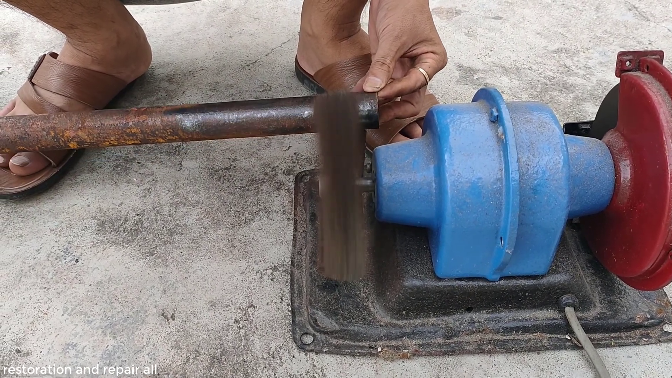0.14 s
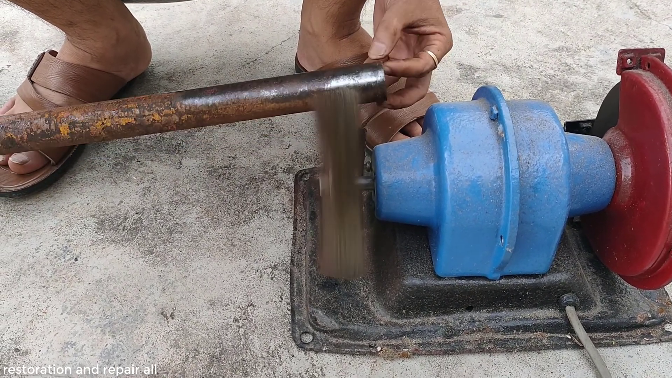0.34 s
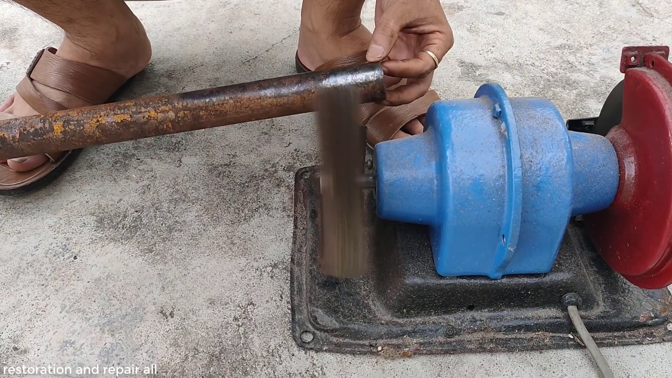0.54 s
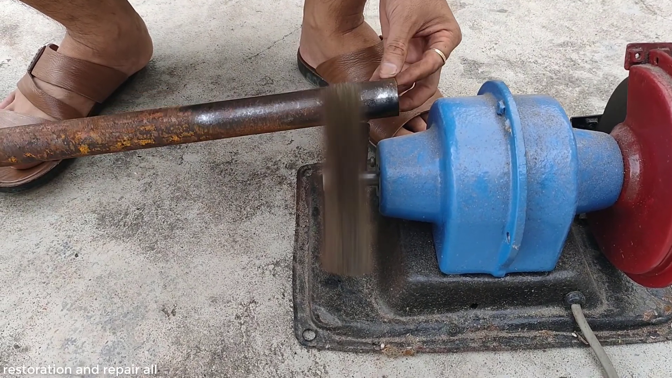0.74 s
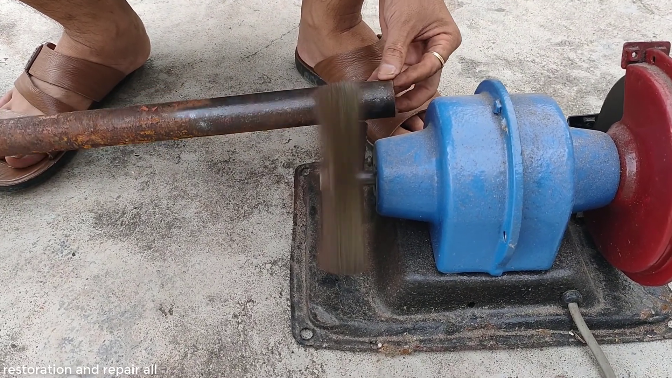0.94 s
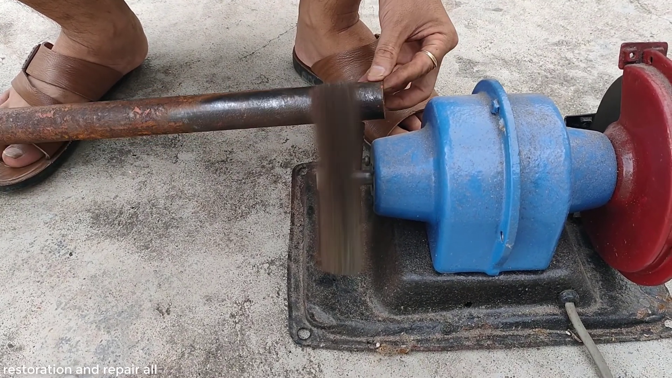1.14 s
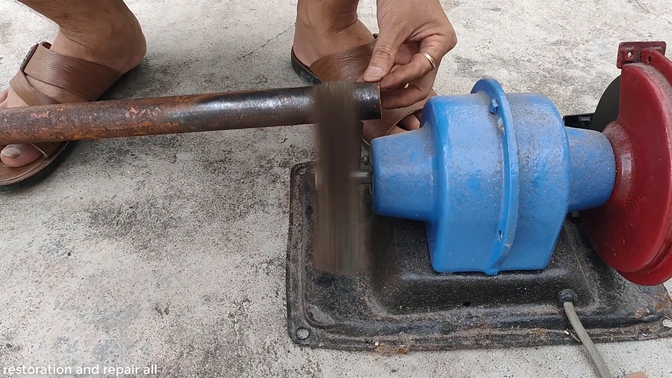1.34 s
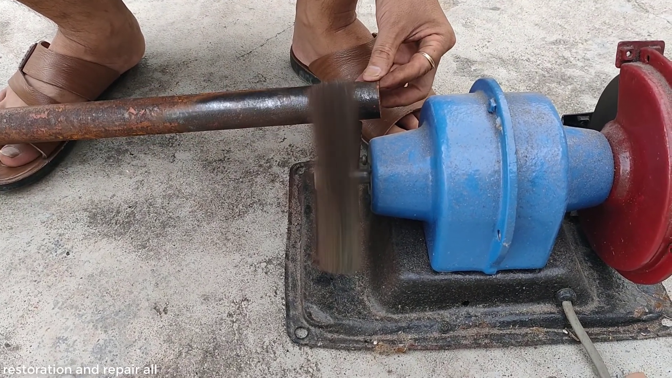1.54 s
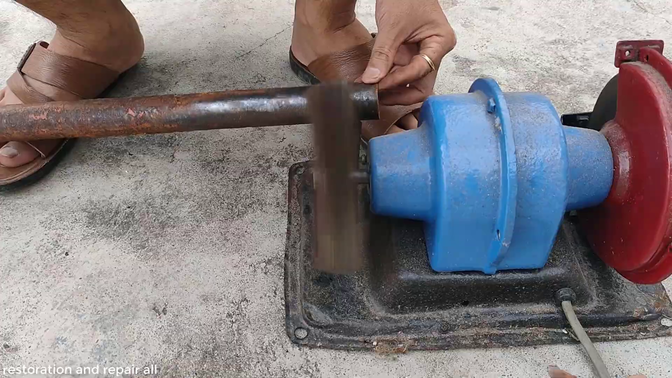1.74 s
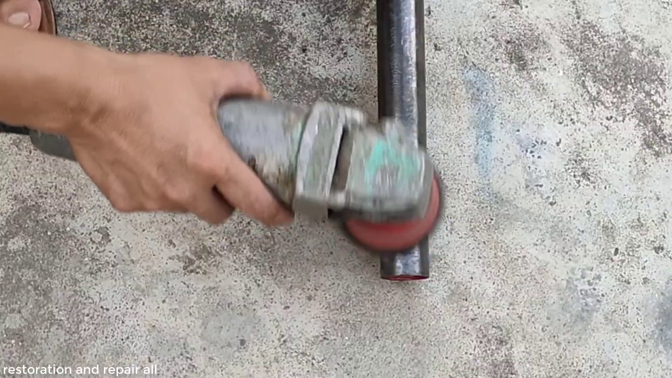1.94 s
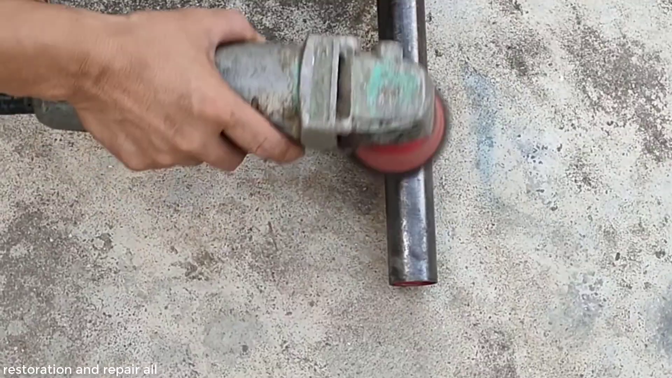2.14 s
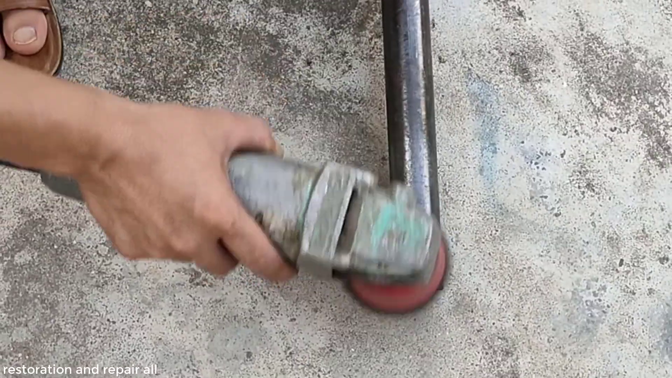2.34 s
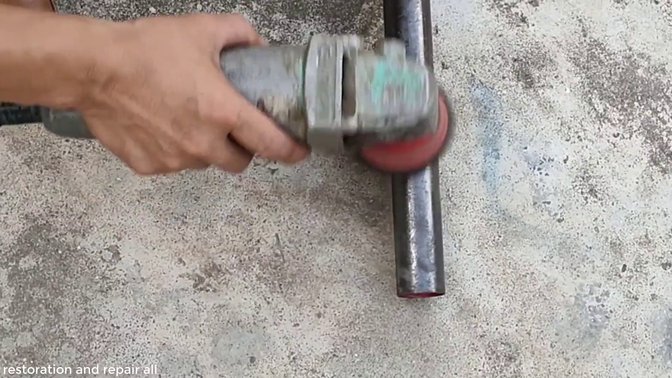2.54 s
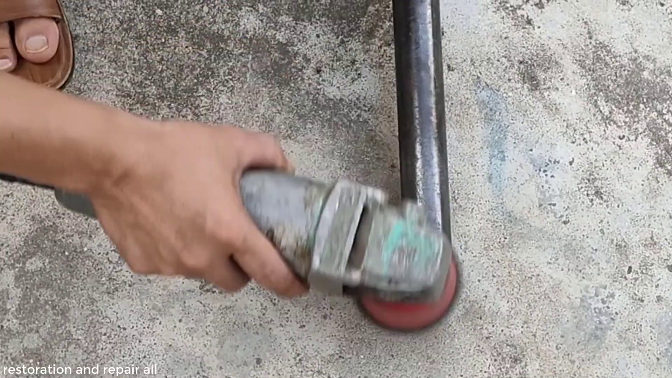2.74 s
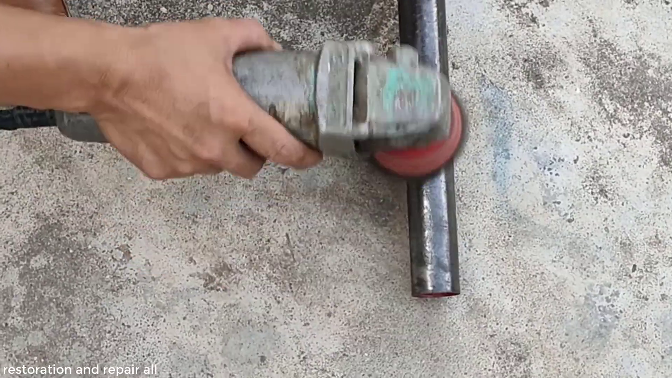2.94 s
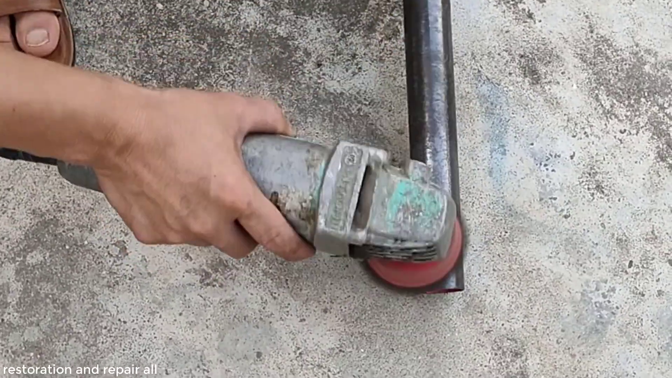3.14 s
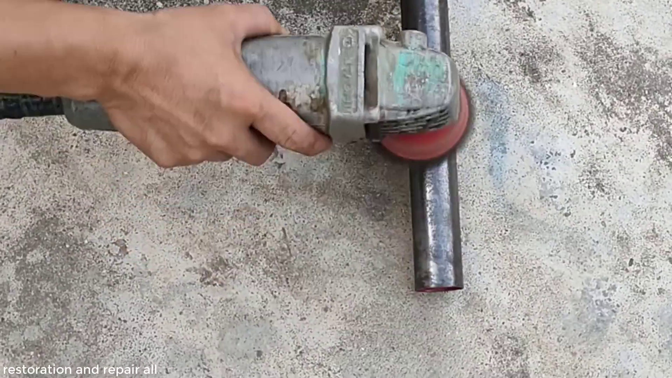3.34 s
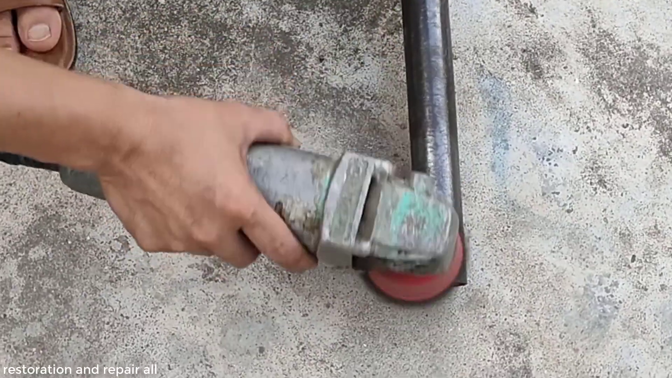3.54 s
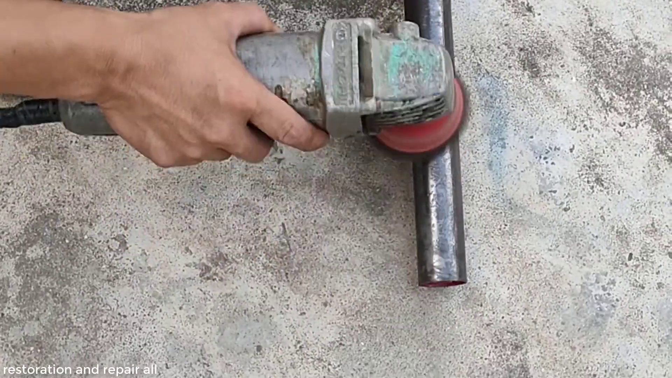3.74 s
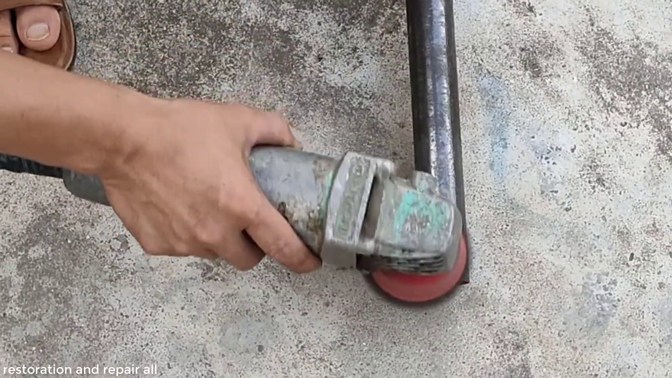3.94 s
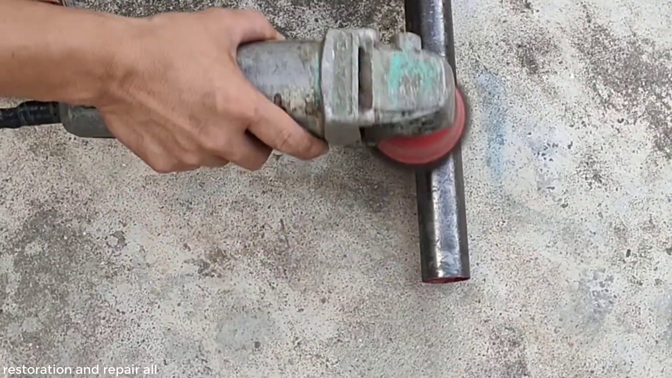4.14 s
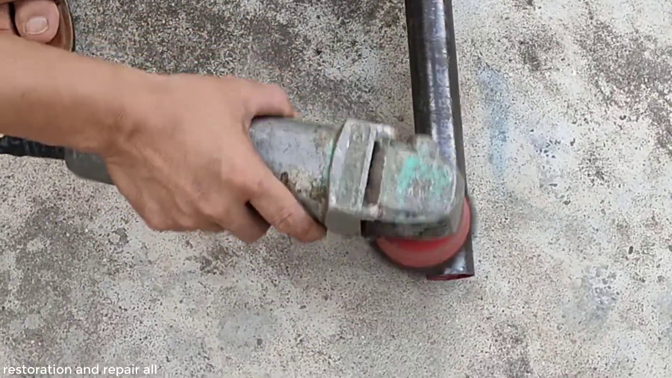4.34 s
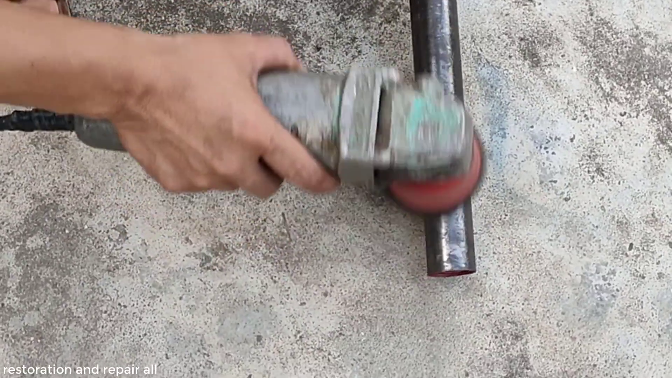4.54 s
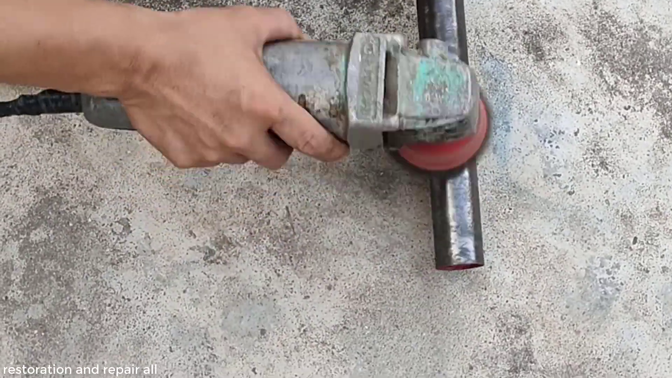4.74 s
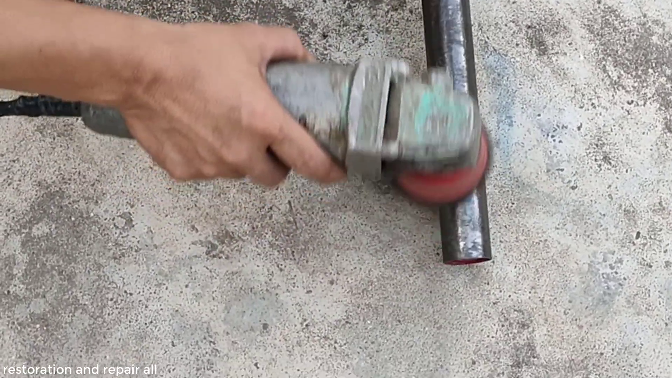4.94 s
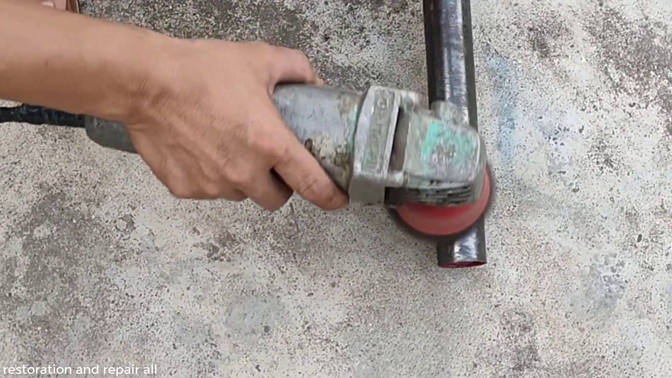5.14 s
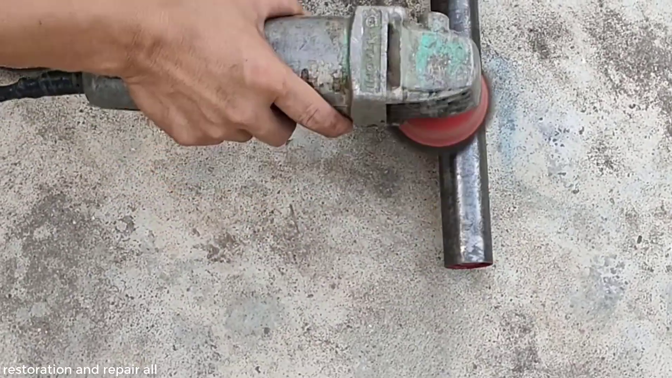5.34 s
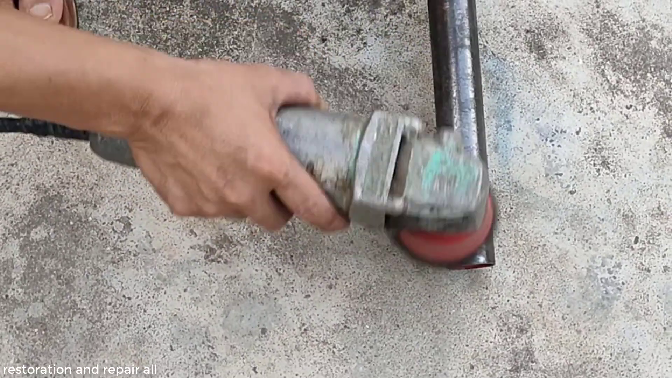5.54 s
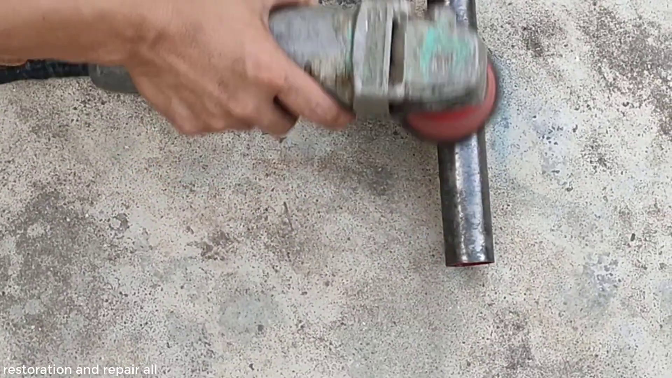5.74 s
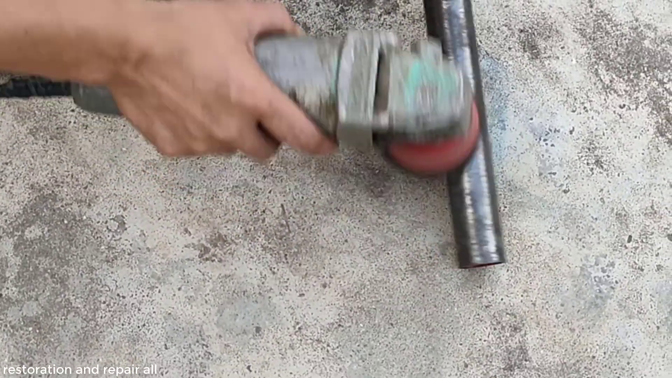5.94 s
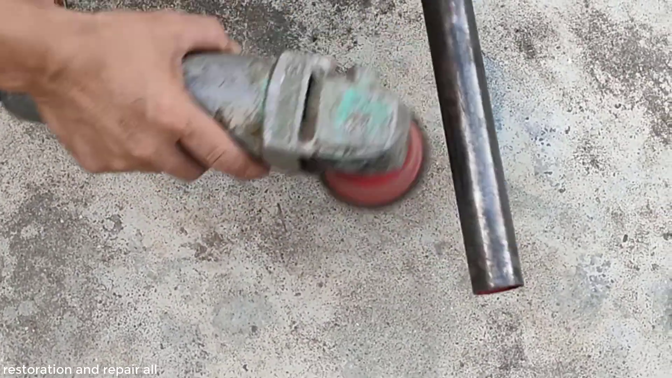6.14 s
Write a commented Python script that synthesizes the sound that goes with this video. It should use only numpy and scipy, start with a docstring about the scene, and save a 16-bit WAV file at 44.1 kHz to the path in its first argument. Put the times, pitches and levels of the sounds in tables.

```python
"""An angle grinder sands a steel tube; before a cut, a wire wheel on a bench grinder brushes the tube.
Angle grinder: lines locked to the armature whine over band-wise noise from the disc, fan and housing.
Wire wheel: its high spot strikes once a turn, pulsing scraping noise and the rings of the tube.
A hum and one sliding ping join the wheel.
Wind rumbles and pops on the two microphone ports of a phone held above the work."""
import sys
import numpy as np
from scipy import signal
from scipy.fft import rfft, irfft, next_fast_len
from scipy.io import wavfile
from scipy.ndimage import uniform_filter1d

SR = 44100
rng = np.random.default_rng(int(sys.argv[2]) if len(sys.argv) > 2 else 0)


def wrap_up_sound(samples):
    """Save the sound to the file named by the first command line argument, as 16-bit audio."""
    columns = np.atleast_2d(samples).T
    # keep every value between -1 and 1, then stretch to whole-number steps
    tamed = np.clip(columns, -1, 1)
    steps = np.round(tamed * 32767).astype(np.int16)
    wavfile.write(sys.argv[1], SR, steps)


N = 277389
T_S = np.arange(N) / SR
CUT_S = 1.945


def undb(db):
    """Amplitude ratio of a level in dB."""
    return 10 ** (np.asarray(db) / 20)


def curves(table):
    """Columns of a table, interpolated over its first column (s)."""
    s, *columns = np.transpose(table)
    return [np.interp(T_S, s, c) for c in columns]


def walk(rate_hz):
    """Random levels held 1 / rate_hz and slewed twice; spread near 1."""
    hold = int(SR / rate_hz)
    steps = np.repeat(rng.standard_normal(N // 50 + 1), hold)[:N]
    return 1.3 * uniform_filter1d(uniform_filter1d(steps, hold), hold)


def colour(x, points, modes=(), lo_hz=1, hi_hz=1e5):
    """Minimum-phase filter from (Hz, dB) points and resonances, kept between two edges."""
    size = next_fast_len(N + 8192) // 2 * 2
    f = np.arange(size // 2 + 1) * SR / size + 1
    point_hz, point_db = np.array(points).T
    db = np.interp(np.log(f), np.log(point_hz), point_db)
    for hz, width_hz, peak_db in modes:
        db = db + peak_db / (1 + (2 * (f - hz) / width_hz) ** 2)
    gain = undb(db) / np.sqrt((1 + (lo_hz / f) ** 16) * (1 + (f / hi_hz) ** 16))
    # folding the cepstrum makes the filter causal
    cepstrum = irfft(np.log(gain + 1e-7), size)
    cepstrum[1:size // 2] *= 2
    cepstrum[size // 2 + 1:] = 0
    return irfft(rfft(x, size) * np.exp(rfft(cepstrum)), size)[..., :N]


def grit(grain_db):
    """Dense ticks of uneven size, two unrelated streams."""
    size_db = grain_db * np.minimum(rng.exponential(size=(2, N)), 5)
    return rng.standard_normal((2, N)) * undb(size_db)


def scrape(beat, mid, side, modes, side_db, lo_hz, hi_hz, grain_db=2.5):
    """One band of friction: ticks through the body; what both ports share has rms 1."""
    ticks = beat * grit(grain_db)
    m = colour(ticks[0], mid, modes, lo_hz, hi_hz)
    s = colour(ticks[1], side, modes, lo_hz, hi_hz) * undb(side_db)
    return np.array([m + s, m - s]) / np.std(m)


# motor slowed by the load, racing as the disc leaves the tube: time_s, mesh_hz, level_db
ANGLE = [(1.95, 8580, -37.5), (2.15, 8695, -36), (2.4, 8630, -37.5), (2.6, 8635, -36.5),
         (2.72, 8645, -36.5), (2.95, 8750, -36), (3.12, 8610, -36), (3.32, 8760, -36.5), (3.5, 8660, -36.5),
         (3.68, 8830, -34.5), (3.92, 8536, -35.5), (4.1, 8680, -36.5), (4.3, 8490, -35.5),
         (4.43, 8696, -35.5), (4.63, 8524, -34.5), (4.75, 8610, -36), (4.9, 8365, -36), (5.0, 8440, -35.5),
         (5.2, 8400, -35), (5.35, 8534, -35), (5.5, 8540, -36.5), (5.63, 8720, -35), (5.85, 8460, -35),
         (6.03, 8570, -35.5), (6.15, 8990, -34.5), (6.29, 9450, -36)]
# rasp shifting between housing rings: time_s, upper_db, lower_db, tilt_db (top over bottom of upper ring)
RASP = [(1.95, -41.5, -47, 3), (2.2, -40.5, -42.5, 2), (2.3, -37.5, -42.5, 1), (2.45, -40, -43, 5),
        (2.62, -40.5, -42, 1), (2.85, -38.5, -45.5, -1), (3.0, -38, -43.5, 4), (3.2, -46, -42.5, 0),
        (3.33, -38.5, -41, 3), (3.6, -40, -44.5, 0), (3.75, -36.5, -41.5, -2), (4.0, -37.5, -42, 0),
        (4.15, -37, -41.5, 7), (4.4, -37.5, -41.5, -4), (4.5, -35, -43, 3), (4.65, -40, -42, 3),
        (4.8, -36.5, -41.5, 3), (4.92, -40, -42.5, 0), (5.2, -37, -42.5, 3), (5.3, -37, -39, 4),
        (5.5, -38, -43, 1), (5.78, -35.5, -40, -3), (5.98, -37, -39.5, -1), (6.1, -36.5, -40, -4),
        (6.29, -39.5, -41.5, 0)]
# band edges: hz
ANGLE_EDGES_HZ = [1, 1500, 2450, 3500, 3970, 4400, 7000, 1e5]
# relative noise spectrum common to both ports: freq_hz, density_db
ANGLE_MID = [(150, -48), (300, -35.5), (600, -27.5), (1000, -25), (1600, -18), (2000, -10.5), (2900, -12),
             (3050, -14), (4000, -7.5), (5200, -7.5), (7000, -10.5), (8100, -20), (9500, -9), (11500, -5),
             (14800, -6), (15700, -16)]
# relative noise spectrum opposed between ports: freq_hz, density_db
ANGLE_SIDE = [(150, -64), (300, -36), (700, -42.5), (1100, -40.5), (1350, -36), (2000, -18.5), (3000, -3.5),
              (3800, -9), (5000, 2), (7400, -1), (8300, -12.5), (9800, 0), (12500, 6), (15000, 2),
              (15700, -16)]
# housing resonances: freq_hz, width_hz, gain_db
HOUSING = [(1990, 330, 7), (3947, 61, 9.5), (4115, 260, 5), (4660, 52, 8), (5800, 82, -1.5)]
# port balance: freq_hz, left_minus_right_db
ANGLE_LEAN = [(3000, 1), (4500, -3), (5500, 3.5), (8600, -1), (10800, 3.5), (12700, 2.5), (15000, -8.5)]
MESH_PER_TURN, SPINDLE_PER_TURN = 88 / 3, 11 / 36
MOTOR_DB, MIDDLE_DB = -46.5, -38.5  # below the rings; between them
DISC_DB, FAN_DB = -4.5, 0.07  # re level_db of ANGLE
PATCHY_DB, PATCHY_RATE_HZ = 1.6, 16


def angle_grinder():
    """Noise bands of housing, disc and fan pulse with the spindle and flicker alone under the armature whine."""
    mesh_hz, level_db = curves(ANGLE)
    upper_db, lower_db, tilt_db = curves(RASP)
    armature_hz = mesh_hz / MESH_PER_TURN
    turns = np.cumsum(armature_hz) / SR
    spindle = np.cos(2 * np.pi * turns * SPINDLE_PER_TURN)
    hand = walk(19)  # pressure on the tube wavers
    bands_db = [MOTOR_DB, lower_db, MIDDLE_DB, upper_db - 5.5 - tilt_db / 2, upper_db - 4 + tilt_db / 2,
                level_db + DISC_DB, level_db + FAN_DB]
    bites = [.4, .9, .7, 1, 1, .6, .45]
    noise = 0
    for band_db, bite, edge in zip(bands_db, bites, zip(ANGLE_EDGES_HZ, ANGLE_EDGES_HZ[1:])):
        beat = undb(bite * (1.2 * walk(45) + .6 * spindle))
        patch_db = .55 * hand + bite * PATCHY_DB * walk(PATCHY_RATE_HZ)
        band = scrape(beat, ANGLE_MID, ANGLE_SIDE, HOUSING, -8.5, *edge)
        noise = noise + undb(band_db + patch_db) * band
    lean = np.array(ANGLE_LEAN)
    leaning = np.array([colour(port, lean * [1, k]) for port, k in zip(noise, (.5, -.5))])
    return leaning + whine(turns, armature_hz)


# multiples of armature speed, 22/9 and 88/3 from the geared-down spindle: order
WHINE_ORDERS = [1, 22 / 9, 88 / 3, 5, 8, 9, 10, 14, 7, 11, 12, 13, 19, 43, 46, 50, 52]


def whine(turns, armature_hz):
    """Lines locked to the armature; the shaft shudders, each line flutters and reaches the ports with its own lag."""
    out = 0
    shudder = .04 * walk(35) + .035 * walk(120)
    for order, line_db in zip(WHINE_ORDERS, whine_levels(armature_hz)):
        apart = min(order / 8.9, 1) * np.array([[1], [-1]])
        phase = 2 * np.pi * order * turns + order * shudder + 0.1 * apart * walk(1.82)
        flutter_db = .4 * min(order / 5, 1) * walk(10) + 1.8 * min(order / 8, 1.2) * walk(30)
        pan_db = 2.2 * apart * walk(4)
        out = out + np.sqrt(2) * undb(line_db + flutter_db + pan_db) * np.sin(phase)
    return out


# first eight orders: rms_db, bite_db (per 10 Hz/s of slowing), free_db (gained running free)
WHINE_STRONG = [(-64, -0.5, 6.5), (-52.5, 0, 13), (-52.5, 0, 2), (-54, 0.2, -6), (-48.5, 0.1, -22),
                (-56, 0.1, -12), (-53, 0.1, -12), (-52.5, 0.2, -24)]
# remaining orders: rms_db
WHINE_STEADY_DB = [-56, -58, -56, -53.5, -62, -60, -59, -54, -59]
# lines ringing out as the tool turns in the hand: order, centre_s, length_s, gain_db
SWELLS = [(8, 2.0, .12, 4), (8, 2.25, .2, 4), (8, 2.68, .3, 4), (8, 3.05, .2, 5), (8, 3.7, .6, 2.5),
          (8, 4.2, .25, 3), (8, 4.5, .1, 10), (8, 4.62, .15, 6), (8, 4.8, .2, 5.5), (8, 5.0, .1, 3),
          (8, 5.15, .2, 9), (8, 5.4, .2, 3), (8, 5.7, .14, 5), (8, 5.86, .12, 4), (9, 2.7, .12, 6),
          (9, 2.3, .12, 5), (9, 3.85, .15, 10), (9, 4.15, .35, 7), (9, 4.9, .12, 6), (9, 5.3, .15, 5),
          (10, 2.1, .1, 5), (10, 2.5, .2, 4), (10, 2.8, .12, 9), (10, 3.1, .4, 6), (10, 3.5, .15, 7),
          (10, 3.95, .22, 10), (10, 4.25, .35, 5), (10, 4.87, .2, 8), (10, 5.22, .2, 8), (10, 5.5, .15, 6),
          (13, 2.2, .25, 6), (13, 3.35, .15, 5), (13, 3.72, .2, 7), (13, 4.1, .15, 6), (13, 4.5, .16, 11),
          (13, 4.8, .12, 6), (13, 5.74, .28, 11), (14, 2.05, .2, 4), (14, 3.0, .15, 7), (14, 3.35, .2, 6),
          (14, 4.1, .4, 9), (14, 4.53, .15, 6), (14, 4.8, .15, 11), (14, 5.2, .5, 5), (14, 5.88, .2, 4),
          (50, 3.8, .3, 4), (50, 5.1, .2, 4), (43, 3.52, .2, 5), (43, 5.48, .2, 5), (52, 5.1, .2, 7),
          (52, 5.87, .2, 6)]
OTHERS_BITE_DB, OTHERS_FREE_DB = 0.36, 0  # remaining orders
LOADED_HZ, FREE_HZ = 297, 322  # armature
WHINE_DRIFT_DB = .4


def whine_levels(armature_hz):
    """Line levels follow motor slowing and running free, swell singly, and drift with the grip."""
    slope_hz_s = uniform_filter1d(np.gradient(armature_hz) * SR, SR // 10)
    slowing = np.clip(-slope_hz_s / 10, -4, 4)
    free = np.clip((armature_hz - LOADED_HZ) / (FREE_HZ - LOADED_HZ), 0, 1)
    lines = WHINE_STRONG + [(db, OTHERS_BITE_DB, OTHERS_FREE_DB) for db in WHINE_STEADY_DB]
    out = []
    for order, (rms_db, bite_db, free_db) in zip(WHINE_ORDERS, lines):
        swell_db = sum(gain_db * np.exp(-(2 * (T_S - centre_s) / length_s) ** 2)
                       for k, centre_s, length_s, gain_db in SWELLS if k == order)
        drift_db = WHINE_DRIFT_DB * walk(2.1)
        out.append(rms_db + bite_db * slowing + free_db * free + swell_db + drift_db)
    return out


# bright ring re scrape: time_s, level_db
BRIGHT_RING = [(0, -7.5), (.3, -0.5), (.7, -3.5), (1.05, -5.5), (1.15, -7), (1.5, -2.5), (1.92, -5)]
# alternate turns strike harder as the tube bounces: time_s, swing_db
BOUNCE = [(1.0, 1), (1.15, 2), (1.5, -0.5), (1.9, 1.5)]
# wires catch the rust hardest: centre_s, extra_force_db
CATCHES = [(.056, 1), (.17, 1), (.197, 3), (.224, 3), (.278, 0), (.433, 2), (.456, 2), (.54, 5), (.61, 3),
           (.745, 5), (1.128, 7), (1.15, 3.5), (1.197, 2), (1.292, 3.5), (1.437, 2), (1.483, 2),
           (1.682, 2.5), (1.708, 1), (1.783, 5.5), (1.86, 4)]
# band edges: hz
WHEEL_EDGES_HZ = [1, 1450, 2150, 2950, 7000, 1e5]
# relative noise spectrum common to both ports: freq_hz, density_db
WHEEL_MID = [(180, -27.5), (300, -18), (580, -16), (670, -8), (900, -5.5), (1350, -7.5), (1520, -8.5),
             (2800, -3.5), (5700, -9), (6800, -13), (7500, -24.5), (9000, -19.5), (9900, -8.5),
             (10800, -19.5), (12100, -3.5), (13200, -5), (14500, -4.5), (15700, -16.5)]
# relative noise spectrum opposed between ports: freq_hz, density_db
WHEEL_SIDE = [(180, -40), (300, -43), (398, -32), (960, -27), (1060, -29), (1150, -25.5), (1700, -9.5),
              (2050, -6), (2370, -15), (2750, -5), (5770, -6.5), (8460, -21), (12600, -0.5), (15100, -6),
              (15900, -24)]
# tube resonances: freq_hz, width_hz, gain_db
TUBE = [(2370, 150, 9), (2720, 120, 5), (3800, 150, 2), (4980, 190, 3), (5650, 250, 3), (12070, 150, 3),
        (13000, 90, 7)]
# low resonances before and after the tube is laid back at another place: freq_hz, width_hz, gain_db
LOW_RING = [
    [(1060, 440, 7), (910, 58, 4.5)],
    [(873, 49, 10), (957, 27, 6), (1070, 100, 5.5), (712, 54, 5.5)],
]
# strike depth of low ring, lower scrape, bright ring, upper scrape: ratio
STRIKE_DEPTH = [1.0, 1.2, 2.1, 1.0]
STRIKE_SHARP, STRIKE_SCATTER_DB = 3.4, 1.6
CATCH_S, REGRIP_S = .009, .36
KNOCK_DB = -7  # re bright ring


def wire_wheel():
    """The high spot hits once a turn, each time with a new force; the tube rings most with it."""
    scrape_db, ring_db, hiss_db, turns = wheel_controls()
    bright_db = curves(BRIGHT_RING)[0]
    force_chance, timing_chance = rng.standard_normal((300, 2))[np.floor(turns + .5).astype(int)].T

    contact = np.clip((scrape_db + 56) / 10, .6, 1)
    catch_db = sum(extra_db * np.exp(-((T_S - s) / CATCH_S) ** 2) for s, extra_db in CATCHES)
    bounce_db = curves(BOUNCE)[0] * np.cos(np.pi * turns)
    force = contact * undb(catch_db + STRIKE_SCATTER_DB * force_chance + bounce_db)
    spot_turns = turns + .04 + .03 * timing_chance
    spot = force * np.exp(STRIKE_SHARP * (np.cos(2 * np.pi * spot_turns) - 1))
    early = np.exp(np.cos(2 * np.pi * (turns + 0.24)) - 1)  # wires spring free a little ahead

    beats = [(1 + depth * spot) * undb(1.1 * walk(70) + .8 * walk(14)) for depth in STRIKE_DEPTH]
    beats.append((1 + .4 * early) * undb(.7 * walk(40) + 1.1 * walk(14)))
    low, *edges = zip(WHEEL_EDGES_HZ, WHEEL_EDGES_HZ[1:])

    low_rings = [scrape(beats[0], WHEEL_MID, WHEEL_SIDE, modes, 3.0, *low) for modes in LOW_RING]
    mix = undb(ring_db) * np.where(np.arange(N) < REGRIP_S * SR, *low_rings)
    impulses = force * np.diff(np.floor(turns + .08), prepend=0)
    knock = colour(impulses, WHEEL_MID, TUBE, *edges[1])
    mix = mix + undb(bright_db + KNOCK_DB) * knock / np.std(knock)
    for beat, band_db, edge in zip(beats[1:], [-7, bright_db, -3, hiss_db], edges):
        mix = mix + undb(band_db) * scrape(beat, WHEEL_MID, WHEEL_SIDE, TUBE, -1.4, *edge)
    return undb(scrape_db) * mix


# bearing of the tube, lifted clear for a moment: time_s, scrape_db, low_ring_re_scrape_db, hiss_re_scrape_db
WHEEL = [(0, -42, 2.5, 6.5), (.08, -42, 3.5, 5), (.16, -40, 4, 2), (.27, -43, 3, 7), (.33, -53.5, 8, 8.5),
         (.385, -58, 8, 9), (.43, -51, 9, 0), (.47, -54, 10, 1), (.5, -54, 9, 3), (.54, -49, 3.5, 4),
         (.61, -49.5, 4.5, 1.5), (.655, -53, 5, 4), (.69, -46.5, 7, 2), (.75, -43.5, 5, 3),
         (.8, -44.5, 4, 3.5), (1.15, -42.5, 2, 4), (1.45, -45, 2, 8), (1.75, -43.5, 1.5, 7),
         (1.92, -42.5, 2.5, 6.5)]
# wheel speed: time_s, turns_hz
WHEEL_SPEED = [(0.0, 29.1), (0.3, 38.9), (0.45, 43.7), (0.6, 43.5), (0.8, 42.4), (1.15, 42.6), (1.6, 40.5),
               (1.85, 38.9), (2.0, 35.4)]
FIRST_TURN = -.46  # turns


def wheel_controls():
    """Scrape level, ring and hiss over it, and the turns made so far (integrated speed)."""
    return *curves(WHEEL), FIRST_TURN + np.cumsum(curves(WHEEL_SPEED)[0]) / SR


# hum, swelling just before the cut: time_s, pitch_hz, level_db
HUM = [(0, 299.5, -56), (.3, 302, -71), (.45, 302, -71), (1.0, 298.5, -62.5), (1.6, 303, -65.5),
       (1.75, 312, -62), (1.87, 307, -46.5), (1.935, 302, -45), (1.95, 305, -68)]


def hum():
    """A low sine with wavering pitch that comes and goes while it is faint."""
    pitch_hz, level_db = curves(HUM)
    waver_db = np.clip((-46 - level_db) / 4, 0, 3.5) * walk(14.14)
    phase = 2 * np.pi * np.cumsum(pitch_hz + 5 * walk(29.85)) / SR
    return np.sqrt(2) * undb(level_db + waver_db) * np.sin(phase) * undb([[-2.5], [2.5]])


# ping as the tube leaves the wheel: centre_s, start_hz, end_hz, half_length_s, level_db
PING = (.312, 1690, 1760, .027, -51.5)


def ping():
    """A sine that slides up under a Gaussian envelope."""
    centre_s, start_hz, end_hz, half_length_s, level_db = PING
    u = (T_S - centre_s) / half_length_s
    pitch_hz = np.interp(u, [-1, 1], [start_hz, end_hz])
    return np.sqrt(2) * undb(level_db) * np.exp(-u ** 2) * np.sin(2 * np.pi * np.cumsum(pitch_hz) / SR)


# relative rumble spectrum: freq_hz, density_db
WIND_COLOUR = [(12, -26), (25, 8.5), (70, 5), (150, -4), (300, -11), (600, -42.5)]
# relative gust spectrum: freq_hz, density_db
GUST_COLOUR = [(40, -4.5), (150, 7.5), (300, -1), (600, -3), (1200, -12), (2400, -47)]
# pressure steps: start_s, signed_size (relative), port (0 left, 1 right)
POPS = [(0, 0.048, 1), (0.026, -0.073, 1), (0.117, 0.13, 1), (0.998, -0.098, 1), (1.092, 0.14, 1),
        (1.135, -0.12, 1), (1.183, 0.14, 1), (2.686, 0.067, 0)]
# hardest buffets: start_s, peak_db (nominal), freq_hz, left_minus_right_db
BUFFETS = [(1.971, -18, 446, -26), (1.982, -25, 650, -20), (1.997, -33, 129, 5), (2.048, -22.5, 300, -20),
           (2.072, -26, 450, -17), (2.09, -35, 160, -17), (2.12, -36, 187, 8), (2.142, -33, 382, -15),
           (2.166, -27, 550, -15), (2.182, -26, 482, -20), (2.191, -39, 300, -13), (2.199, -25.5, 179, -20),
           (2.243, -31, 400, -17), (2.286, -30, 248, -19), (2.298, -27.5, 353, -17), (2.335, -31, 352, -16),
           (2.353, -33.5, 167, 15), (2.453, -40, 115, -19), (4.664, -34, 174.6, 25), (4.678, -35, 200, 28),
           (4.829, -30, 100, -24), (4.861, -44, 130.4, -17), (4.945, -47, 201, -15), (4.969, -39, 260, -10),
           (5.021, -30.5, 130.9, 14), (5.031, -32, 119.5, -15), (5.043, -25, 80.5, 17),
           (5.072, -39, 140, -15), (5.09, -39, 160.1, 16), (5.103, -43, 159.5, 15),
           (5.187, -31.5, 167.8, -21), (5.21, -44, 352.2, -20), (5.735, -34, 59.7, 20),
           (5.7468, -22, 190, 26), (5.752, -28.5, 453, 20), (5.766, -35, 220, 15)]
BUFFET_RISE_CYCLES, BUFFET_FALL_CYCLES = .12, .85


def wind():
    """Eddies rumble on each port alone, brighter in gusts; steps sag back through the capsule's low cut."""
    db = gust_levels()
    slow, quick = (colour(rng.standard_normal((2, N)), c) for c in (WIND_COLOUR, GUST_COLOUR))
    flutter = undb([1.4 * walk(51.0), 2.0 * walk(45.04)])
    out = undb(np.minimum(db, -39) + 1.0) * slow / np.std(slow)
    out += undb(db + 0.8 * (db + 31.0) - 5.0) * flutter * quick / np.std(quick)
    for start_s, signed_size, port in POPS:
        t = np.maximum(T_S - start_s, 0)
        sag = 0.66 * np.exp(-t / 0.045) * np.cos(2 * np.pi * 9 * t)
        out[port] += signed_size * (1 - np.exp(-t / 0.00036)) * sag
    for start_s, peak_db, freq_hz, pan_db in BUFFETS:
        cycles = np.maximum((T_S - start_s) * freq_hz, 0)
        share = 2 / (1 + undb([[-pan_db], [pan_db]]))
        envelope = (1 - np.exp(-cycles / BUFFET_RISE_CYCLES)) * np.exp(-cycles / BUFFET_FALL_CYCLES)
        out += undb(peak_db) * share * envelope * np.cos(2 * np.pi * (cycles - .12))
    return out


# wind control level between gusts, one row before and one after the cut: left_db, right_db
BREEZE_DB = [(-56, -58), (-62.5, -64)]
# gust control level: peak_s (full strength reached), hold_s, peak_db, port (0 left, 1 right)
GUSTS = [(.24, 0.0098, -51, 0), (.24, 0.0069, -49, 1), (0.656, 0, -41, 0), (0.734, 0, -33.5, 1),
         (0.798, 0.041, -46, 0), (.875, 0.003, -39.5, 1), (0.93, 0.13, -43.5, 0), (1.09, 0.018, -49, 1),
         (1.155, 0, -41.5, 0), (1.36, 0, -48, 0), (1.394, 0.055, -42, 1), (1.545, 0.023, -36.5, 0),
         (1.526, 0.08, -43, 1), (1.705, 0.0031, -47, 0), (1.74, 0.061, -49, 1), (1.77, 0.07, -44, 0),
         (1.95, 0.052, -37, 0), (1.974, 0.015, -27, 1), (2.044, 0.051, -30, 1), (2.082, 0.11, -40, 0),
         (2.136, 0.062, -31.5, 1), (2.245, 0.074, -34.5, 1), (2.33, 0.041, -39, 0), (2.47, 0, -37.5, 1),
         (2.45, 0.089, -51, 0), (2.65, 0, -47, 1), (2.973, 0.016, -44, 0), (3.061, 0.063, -57, 0),
         (3.3, 0.016, -47.5, 1), (3.814, 0.077, -45.5, 0), (3.892, 0.014, -55, 1), (3.97, 0.033, -49.5, 0),
         (4.119, 0.15, -57, 0), (4.63, 0.03, -43, 0), (4.685, 0, -35, 0), (4.92, 0.00048, -46, 0),
         (5.09, 0.0086, -40.5, 0), (2.3, .05, -41, 0), (4.836, 0, -33, 1), (4.865, 0.0049, -47, 0),
         (4.97, 0, -32.5, 1), (4.976, .12, -39.5, 0), (5.04, 0.042, -41.5, 1), (5.197, 0.018, -41, 1),
         (5.202, 0.085, -55, 0), (5.474, 0, -47.5, 1), (5.653, 0.03, -46, 0), (5.738, 0.037, -43.5, 1),
         (5.746, 0.00091, -33.5, 0), (5.813, 0.0097, -45.5, 0), (6.197, 0.12, -50, 1)]
GUST_RISE_DB_S, GUST_FALL_DB_S = 291, 256  # of the control level


def gust_levels():
    """Control level on each port: a breeze, and over it gusts that rise, hold and fall away."""
    db = np.where(T_S < CUT_S, *np.array(BREEZE_DB)[:, :, None])
    for peak_s, hold_s, peak_db, port in GUSTS:
        rise_db = GUST_RISE_DB_S * np.maximum(peak_s - T_S, 0)
        fall_db = GUST_FALL_DB_S * np.maximum(T_S - peak_s - hold_s, 0)
        db[port] = np.maximum(db[port], peak_db - rise_db - fall_db)
    return db


def scene():
    """Wheel, hum and ping crossfade in 5.6 ms to the angle grinder at the cut; wind runs throughout."""
    after = np.clip((T_S - CUT_S) / 0.0056 + .5, 0, 1)
    return (1 - after) * (wire_wheel() + hum() + ping()) + after * angle_grinder() + wind()


TOP_HZ = 15650


def record(dry):
    """The phone cuts the top: a steep elliptic low-pass."""
    return signal.sosfilt(signal.ellip(16, .3, 70, TOP_HZ, fs=SR, output="sos"), dry)


dry = scene()
out = record(dry)
wrap_up_sound(out)
```